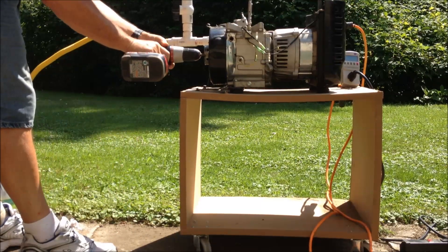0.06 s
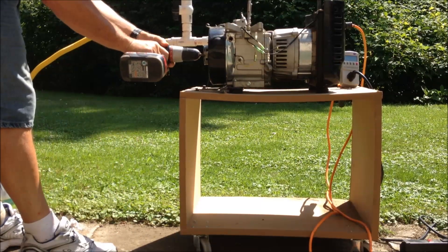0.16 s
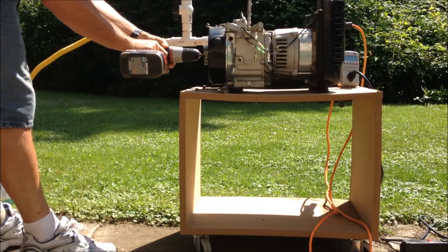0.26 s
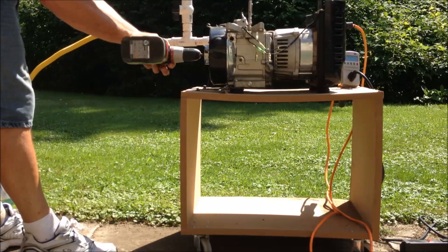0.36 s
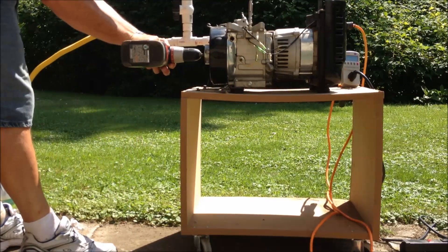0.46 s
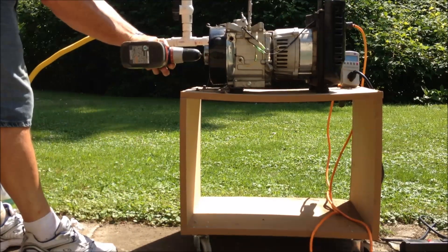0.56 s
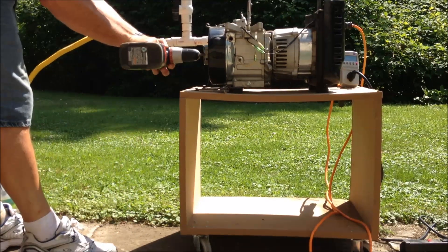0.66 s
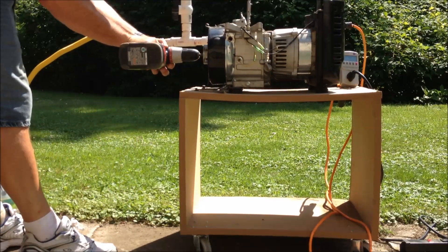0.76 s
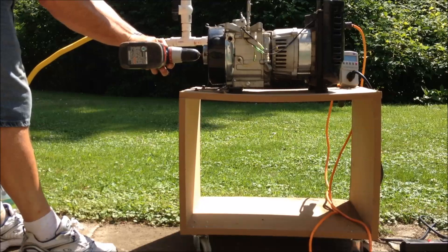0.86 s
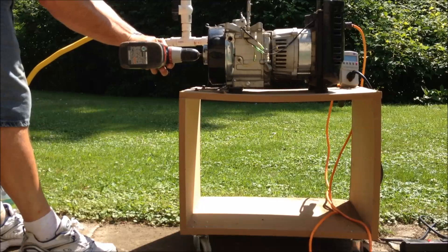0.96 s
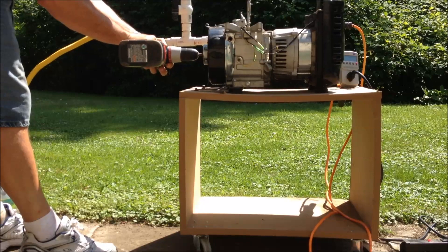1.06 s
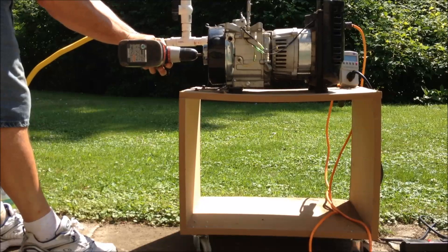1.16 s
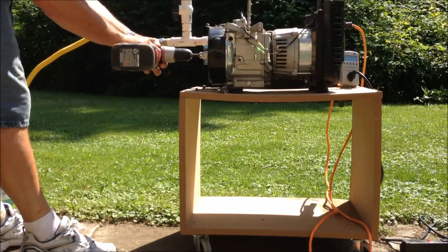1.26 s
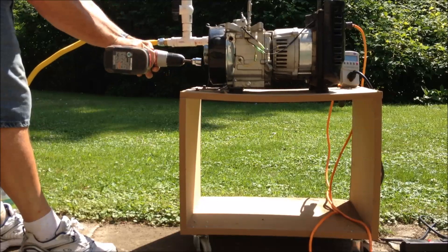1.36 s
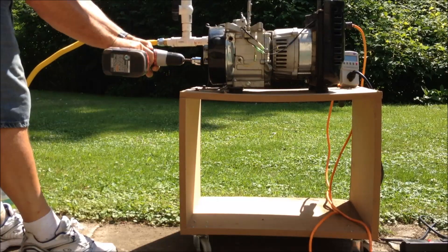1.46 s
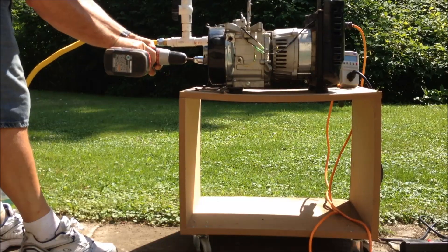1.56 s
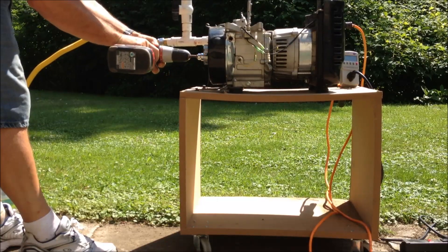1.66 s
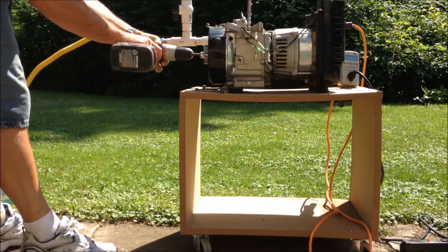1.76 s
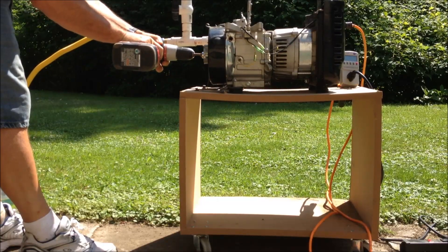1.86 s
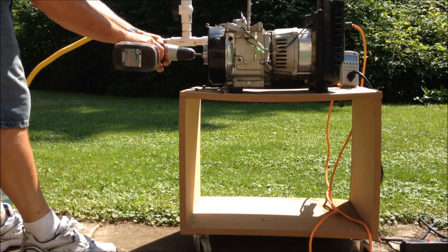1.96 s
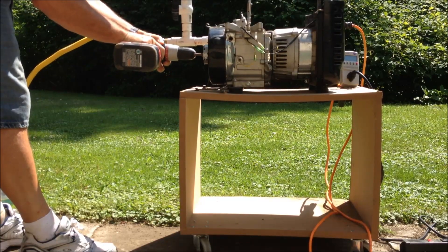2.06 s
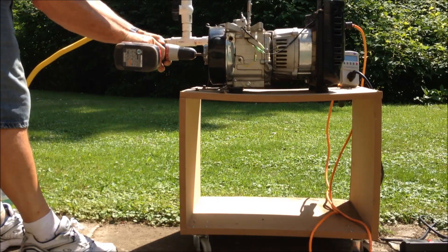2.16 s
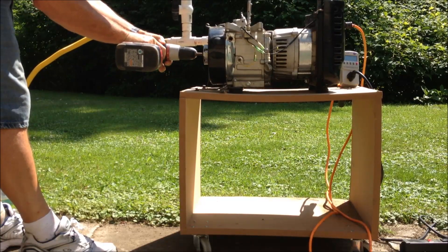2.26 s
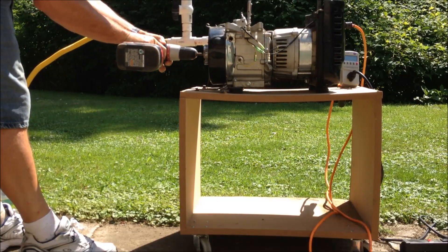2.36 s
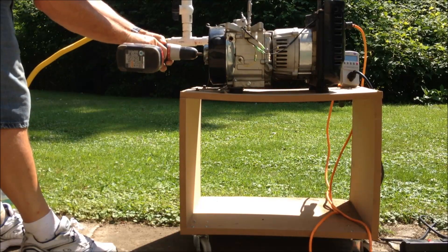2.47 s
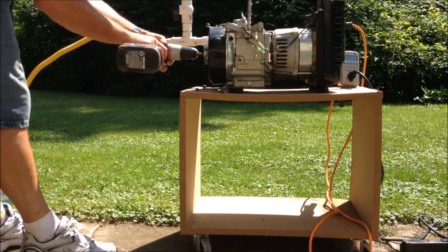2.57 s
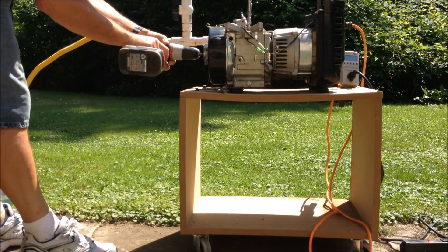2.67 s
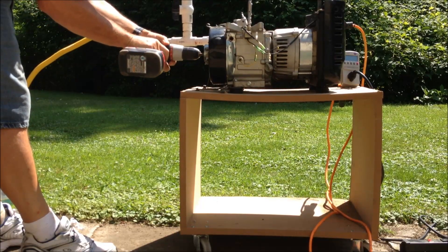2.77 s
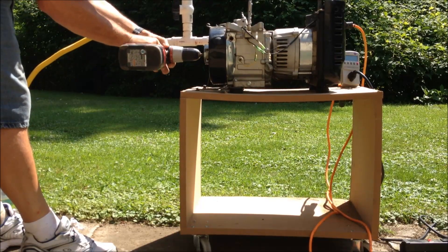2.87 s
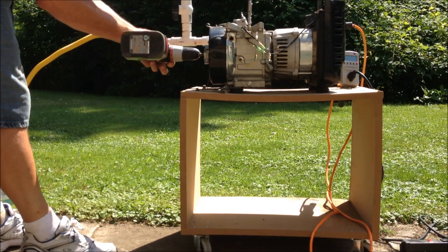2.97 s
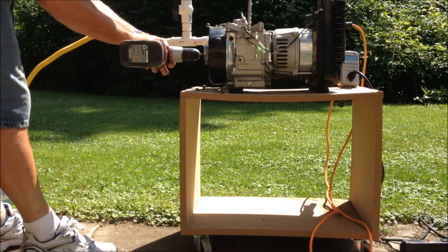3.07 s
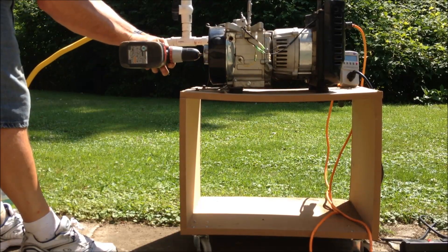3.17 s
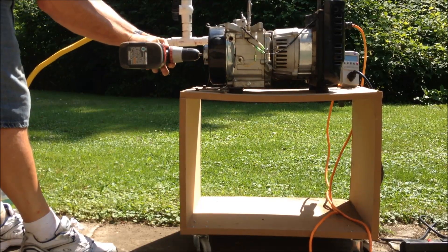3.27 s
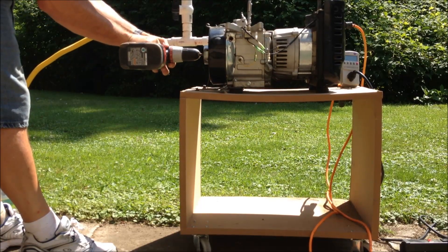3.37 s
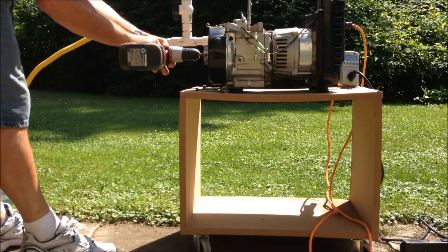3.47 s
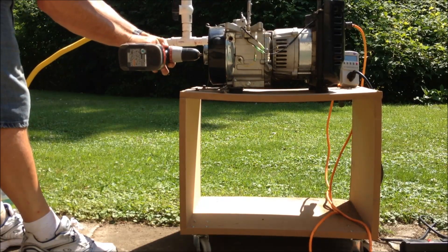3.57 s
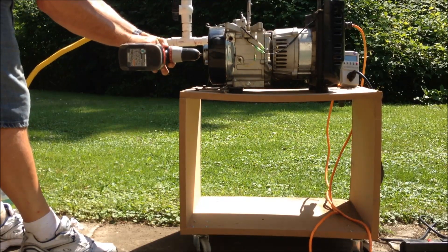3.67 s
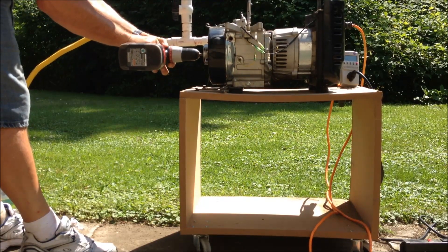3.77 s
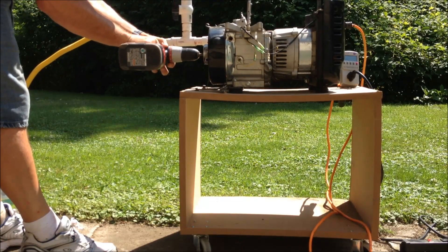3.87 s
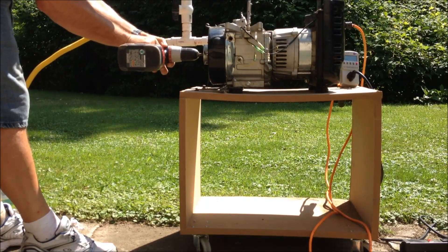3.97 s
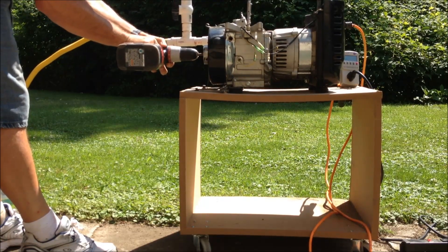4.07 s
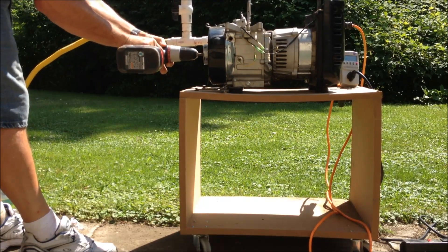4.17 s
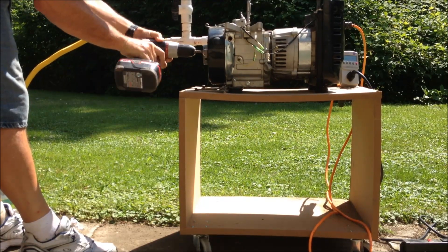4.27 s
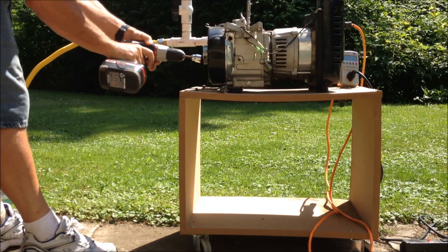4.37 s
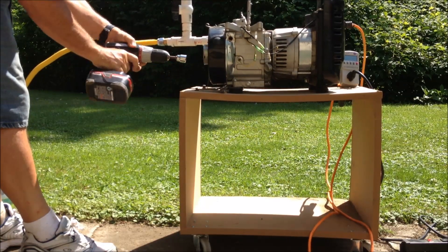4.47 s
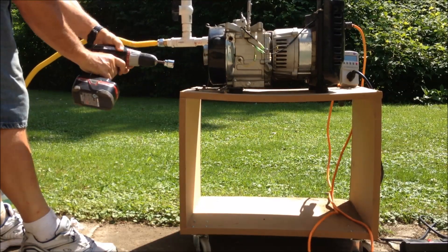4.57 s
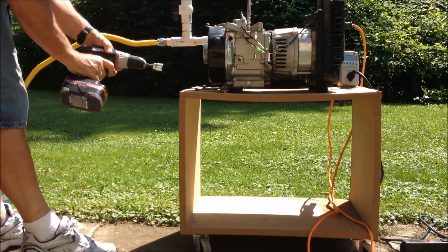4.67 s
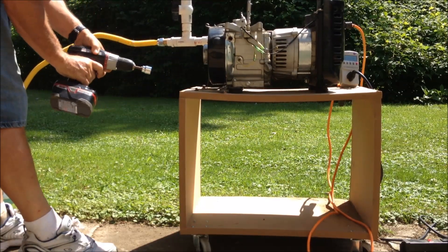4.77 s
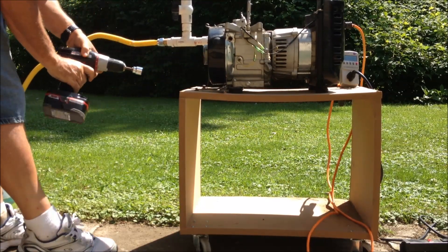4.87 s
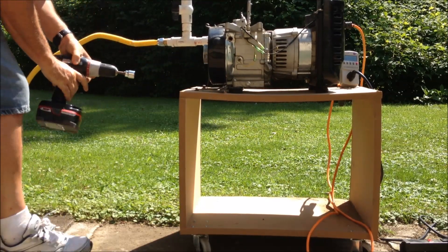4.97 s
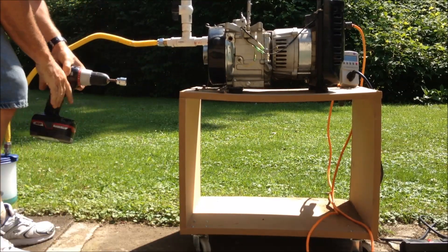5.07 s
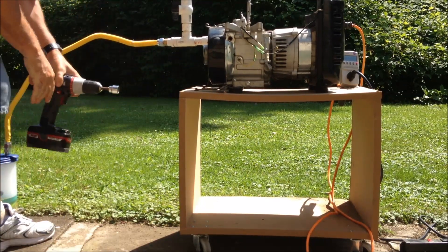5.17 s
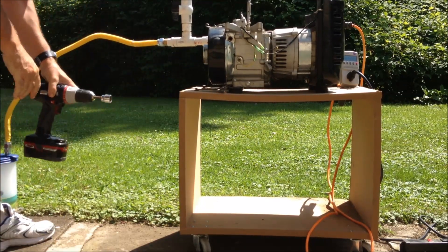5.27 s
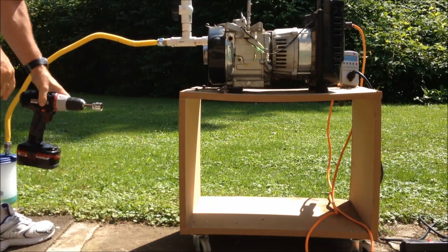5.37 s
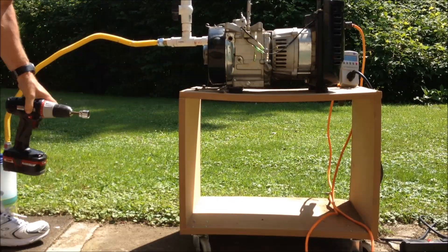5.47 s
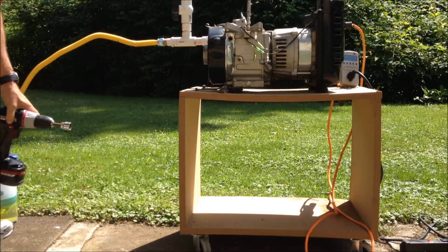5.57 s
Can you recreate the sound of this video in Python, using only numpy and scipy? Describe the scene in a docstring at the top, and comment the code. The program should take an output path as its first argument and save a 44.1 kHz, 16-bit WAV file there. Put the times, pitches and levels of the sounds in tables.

```python
"""In a garden, a cordless drill cranks a small four-stroke generator engine on a wooden stand.
First try: the gears whine, dragged down by each compression; the drill stops and friction slows the
unfired engine knock by knock, the socket rattling on its nut.
Second try: the gears squeal as the engine fires and overruns the drill; it throws the socket off with
a clink and settles at about 23 turns a second, clattering and puffing through its muffler."""
import sys
import numpy as np
from scipy import signal
from scipy.fft import rfft, irfft, next_fast_len
from scipy.io import wavfile
from scipy.ndimage import uniform_filter1d

SR = 44100
rng = np.random.default_rng(int(sys.argv[2]) if len(sys.argv) > 2 else 0)


def wrap_up_sound(samples):
    """Save the sound to the file named by the first command line argument, as 16-bit audio."""
    columns = np.atleast_2d(samples).T
    # keep every value between -1 and 1, then stretch to whole-number steps
    tamed = np.clip(columns, -1, 1)
    steps = np.round(tamed * 32767).astype(np.int16)
    wavfile.write(sys.argv[1], SR, steps)


N = 247401
TIME = np.arange(N) / SR
CATCH_START_S, CATCH_END_S = 4.354, 4.545
FIRING = np.clip((TIME - CATCH_START_S) / (CATCH_END_S - CATCH_START_S), 0, 1)  # 0 unfired, 1 running
CRANK_TURNS_PER_S, RUN_TURNS_PER_S = 20, 23.5
PUFF_PLACE = -.015  # firing puff; a place is a share of the two-turn cycle

# Trigger pulls. Each row: start in seconds, top gear pitch in Hz, then in seconds: gears unloaded,
# motor braked, braking time.
PULLS = [(.345, 2990, 1.237, 1.24, .085), (2.915, 2965, 3.99, 4.322, .04)]
# Resonances of crankcase, cowl and stand. Each row: centre in Hz, width in Hz, lift in dB.
CASE_MODES = [(496.3, 17, 13.5), (683, 5.3, 10), (713.5, 11, 11.5), (825, 6.8, 9), (911, 20.5, 9.5),
              (1094, 11, 10), (1146, 19, 8), (1610, 25, 6.5), (1715, 15, 9), (1996, 24, 7), (2188, 44, 9.5),
              (2395, 33, 8), (2598, 43, 8), (2744, 58, 8.5), (3067, 93, 7.5), (3620, 370, 6.5),
              (3935, 71, 10.5), (4195, 53, 12)]
# Spectrum of the drill's hiss. Each row: frequency in Hz, level in dB.
HISS_COLOUR = [(300, -19), (1500, 9.5), (3000, 12), (4300, 15.5), (5500, 1), (6500, 5), (8500, 2.5),
               (10500, -3), (15000, -11)]


def undb(db):
    """Decibels to gain."""
    return 10 ** (np.asarray(db) / 20)


def unit(x):
    """Scale to rms 1."""
    return x / np.sqrt(np.mean(x ** 2) + 1e-18)


def curves(table):
    """Each column of (s, ..) rows, interpolated over time."""
    s, *columns = np.transpose(table)
    return [np.interp(TIME, s, c) for c in columns]


def during(start_s, end_s):
    """1 between two times, with soft edges."""
    return uniform_filter1d(1. * ((TIME >= start_s) & (TIME <= end_s)), size=400)


def add(out, s, sound):
    """Mix a sound in at a time."""
    i = int(np.clip(s * SR, 0, N))
    out[i:i + len(sound)] += sound[:N - i]


def walk(rate_hz):
    """Smooth random wander, spread near 1."""
    k = int(SR / rate_hz)
    return 1.27 * uniform_filter1d(np.repeat(rng.standard_normal(N // k + 1), k), k)[:N]


def colour(x, points, resonances=()):
    """Minimum-phase filter from a spectrum and resonances; white noise keeps its level."""
    n = next_fast_len(N + SR // 4) // 2 * 2
    f = np.arange(n // 2 + 1) * SR / n
    hz, db = np.transpose(points)
    gain = undb(np.interp(np.log(f + 1), np.log(hz), db))
    peaks = sum((undb(lift) ** 2 - 1) / (1 + (2 * (f - c) / w) ** 2) for c, w, lift in resonances)
    cepstrum = irfft(np.log(unit(gain * np.sqrt(1 + peaks))), n)
    cepstrum[1:n // 2] *= 2
    cepstrum[n // 2 + 1:] = 0
    return irfft(rfft(x, n) * np.exp(rfft(cepstrum)), n)[:N]


def ring(x, modes):
    """Drive (Hz, dB, t60 s) modes; white noise keeps its level."""
    t = np.arange(SR // 4) / SR
    tail = sum(undb(db) * np.cos(2 * np.pi * hz * t) * undb(-60 * t / t60) for hz, db, t60 in modes)
    return signal.fftconvolve(x, tail / np.linalg.norm(tail))[:N]


def grit(per_s, scatter_db):
    """Dense tiny impacts of uneven size, rms 1."""
    impacts = (rng.random(N) < per_s / SR) * rng.choice([-1, 1], N)
    return unit(impacts * undb(scatter_db * rng.standard_normal(N)))


def blows(events, rise_s, decay_s):
    """Envelope of (s, dB) blows; powers add."""
    t = np.arange(SR // 4) / SR
    shape = (1 - np.exp(-t / rise_s)) * np.exp(-t / decay_s)
    power = np.zeros(N)
    for s, db in events:
        add(power, s, (undb(db) * shape / shape.max()) ** 2)
    return np.sqrt(power)


def steady(envelope):
    """Divide out an envelope's slow level."""
    return envelope / np.sqrt(uniform_filter1d(envelope ** 2, size=SR // 5) + 1e-9)


def each_cycle(cycle, places, scatter_db=1):
    """(s, dB) of every blow, from one cycle's (place, dB) pattern."""
    counts = np.arange(int(cycle[-1]) + 1)
    chance = rng.standard_normal((len(counts), len(places)))
    return [(np.interp(k + place, cycle, TIME), db + scatter_db * chance[k, j])
            for k in counts for j, (place, db) in enumerate(places) if 0 < k + place < cycle[-1]]


def pushes(cycle, places):
    """An impulse at each (place, dB) of every cycle; rms 1 while the crank turns."""
    out = np.zeros(N)
    for s, db in each_cycle(cycle, places):
        add(out, s, undb([db]))
    return out / np.std(out[np.gradient(cycle) > 0])


def compression(cycle, place, width):
    """Peaks at 1 once a cycle, as the piston squeezes the charge."""
    return np.exp(-(((cycle - place + .5) % 1 - .5) / width) ** 2)


def coasting():
    """1 between the pulls, when nothing drives the engine."""
    return during(PULLS[0][3], PULLS[1][0])


def garden(hush_db=-38):
    """Outdoor hush and the wavering drone of a far motor."""
    # Each row: time in seconds, pitch in Hz, level in dB.
    drone_path = [(0, 143, -55), (.8, 133.4, -49.5), (2.1, 136.9, -47), (2.5, 133.3, -51),
                  (3.6, 135.6, -48), (5.6, 143, -55)]
    # Each row: frequency in Hz, level in dB.
    hush_colour = [(15, -79), (25, -55), (80, -13.5), (104, -5.5), (126, -7.5), (148, 1), (164, -9.5),
                   (233, 2), (297, -4.5), (349, -6), (552, -6.5), (1020, 1.5), (1170, -3.5), (1300, -3),
                   (4200, -21.5), (5500, -34.5), (8000, -34), (15500, -50)]
    hz, db = curves(drone_path)
    phase = 2 * np.pi * np.cumsum(hz * (1 + .01424 * walk(11))) / SR
    drone = np.sqrt(2) * undb(db + 2 * walk(4.9)) * np.sin(phase)
    return drone + colour(rng.standard_normal(N), hush_colour) * undb(hush_db + 1.85 * walk(6.7))


def chink(freedom, grip_db=6):
    """One ring of the socket: the tighter the hold, the shorter and more varied."""
    # Each row: frequency in Hz, level in dB, free t60 in seconds.
    modes = [(4400, -7, 0.079), (6180, -10, 0.17), (6580, -4, 0.073), (7800, -2, 0.14), (7970, -7, .1),
             (8452, -6, .04), (10350, -18, 0.14), (12150, -16, .12), (12680, -22, .11), (14200, -15, .13)]
    t = np.arange(SR // 5) / SR
    out = np.zeros(len(t))
    for hz, db, t60 in modes:
        gain = undb(db + grip_db * (1.5 - freedom) * rng.uniform(-1.1, 1))
        out += gain * np.sin(2 * np.pi * (hz * t + rng.random())) * undb(-60 * t / (t60 * freedom))
    return out


def socket(speed, rattle_db=-3, rise_s=.0027, tail_db=-10, loose_db=-48):
    """The steel socket rattles drily on the nut and rings when struck."""
    # Each row: start in seconds, level in dB.
    rattles = [(1.29, -25), (1.356, -31), (1.402, -25.5), (1.474, -31.5), (1.524, -26), (1.605, -34),
               (1.665, -27), (1.738, -32), (1.824, -28.5), (1.912, -46), (2.018, -33), (2.03, -35),
               (2.138, -42), (2.29, -41), (2.327, -35), (2.916, -30)]
    # Each row: start in seconds, ring in dB, crack in dB, freedom to ring from 0 to 1.
    clinks = [(1.673, -44, -40, .5), (2.366, -40, -40, 0.8), (2.41, -49, -40, .3), (2.731, -43.5, -48, .35),
              (4.372, -27, -19.5, 0.5), (4.378, -19, -23, 1), (4.391, -26, -34, 0.9)]
    # Each row of both: frequency in Hz, level in dB.
    rattle_colour = [(500, -12), (2000, 11.5), (4000, 8), (6000, -3), (8300, 0.5), (10000, -7.5),
                     (12000, -11.5), (15000, -18)]
    crack_colour = [(500, -6), (2000, 6), (4200, 7), (5500, -13), (6500, -2), (7700, 8), (9200, -3),
                    (11000, -12), (14300, -8), (15000, -10)]
    tails = undb(tail_db) * blows(rattles, rise_s, decay_s=.059)
    bursts = undb(rattle_db) * np.hypot(blows(rattles, rise_s, decay_s=.014), tails)
    loose = undb(loose_db + 2.5 * walk(70)) * coasting() * speed / CRANK_TURNS_PER_S
    cracks = blows([(s, db) for s, _, db, _ in clinks], rise_s=.0012, decay_s=.014)
    out = colour(grit(11000, 2.8) * np.hypot(bursts, loose), rattle_colour)
    out += colour(grit(11000, 1.5) * cracks, crack_colour)
    for s, ring_db, _, freedom in clinks:
        add(out, s, undb(ring_db) * chink(freedom))
    return out


def motor_start(lead_s=.029, level_db=-44.5):
    """On the first pull the motor whirs while the drive's play is taken up."""
    swell = blows([(PULLS[0][0] - lead_s, level_db)], rise_s=.05, decay_s=.076)
    return colour(grit(12000, 2.7) * swell, HISS_COLOUR)


def squeals(overtone_db=-13):
    """The gears squeal as the firing engine snatches the drill."""
    # Each row: start in seconds, first and last pitch in Hz, length in seconds, level in dB,
    # roughness as a share of the pitch.
    glides = [(4.023, 3250, 2970, 0.024, -15, 0.02), (4.062, 3300, 2870, 0.017, -12.5, 0),
              (4.1, 3250, 3090, 0.036, -16.5, 0.09), (4.145, 3280, 2830, 0.035, -16, 0),
              (4.27, 3580, 3720, 0.0345, -15, 0.07), (4.289, 3246, 2794, 0.056, -13.5, 0.12)]
    out = np.zeros(N)
    for s, start_hz, end_hz, length_s, db, rough in glides:
        n = int(length_s * SR)
        hz = np.linspace(start_hz, end_hz, n) * (1 + rough * walk(2000)[:n])
        phase = 2 * np.pi * np.cumsum(hz) / SR
        tone = np.sin(phase) + undb(overtone_db) * np.sin(2.07 * phase)
        add(out, s, undb(db) * np.hanning(n) * tone)
    return out


def drill_speed(pull, spin_up_s=.175):
    """Share of top speed: the motor gathers speed ever more slowly, then is braked."""
    start_s, _, _, braked_s, braking_s = pull
    rise = 1 - np.exp(-np.maximum(TIME - start_s, 0) / spin_up_s)
    return rise * np.clip(1 - (TIME - braked_s) / braking_s, 0, 1)


def drill(pull, cycle, housing_hz=2900, housing_width_hz=500, socket_hz=6450, shudders_per_cycle=5.5):
    """Gear whine and hiss grow with speed; each compression drags them down and shakes the drive."""
    # Each row: multiple of the whine's pitch, level in dB.
    overtones = [(2.02, 4), (3, -4), (4.01, -8), (5.02, -14), (6, -19)]
    # Chuck and socket resonances. Each row: centre in Hz, width in Hz, lift in dB.
    chuck_modes = [(4340, 240, 3), (6510, 200, 3.5), (8660, 520, 2)]
    start_s, top_hz, unloaded_s, _, _ = pull
    speed = drill_speed(pull)
    hz, speed_db = top_hz * speed, 20 * np.log10(speed + 1e-4)
    housing_db = 7.5 / (1 + (2 * (hz - housing_hz) / housing_width_hz) ** 2)
    whine_db = -27 + 1.2 * speed_db + housing_db
    gear_db = -25 + .78 * speed_db
    strain = np.clip((.92 - speed) * 5, 0, 1)
    drag = compression(cycle, place=.88, width=.1)
    shudder = 2 * np.pi * shudders_per_cycle * ((cycle + .1) % 1 - .11)
    jitter = .011 * walk(450) + .014 * strain * walk(900)
    hz = hz * (1 - .032 * drag - .0072 * np.sin(shudder) + jitter)
    phase = 2 * np.pi * np.cumsum(hz) / SR
    # uneven teeth roughen the whine and smear its overtones
    rough_db, smear = (2.2 + 1.5 * strain) * walk(420), .45 * walk(700)
    size = undb(whine_db - 9 * drag + 3 * np.cos(shudder) + rough_db)
    whine = size * (np.sin(phase + smear / 2) + undb(-15) * np.sin(2 * phase + smear))
    # overtones stand out under strain
    upper = sum(undb(db) * np.sin(k * (phase + smear * (1 - strain))) for k, db in overtones)
    whine += upper * undb(gear_db - 18.5 + 6 * strain + rough_db)
    # the third partial sweeps through the socket's ring
    third = undb(gear_db - 6) * np.sin(3 * phase + smear)
    ringing = signal.lfilter(*signal.iirpeak(socket_hz, Q=18, fs=SR), third)
    hiss = colour(grit(12000, 3.7) * undb(gear_db - drag + 1.4 * walk(60)), HISS_COLOUR, chuck_modes)
    singing = during(start_s, unloaded_s) * np.clip((speed - .35) / .25, 0, 1)
    return (whine + ringing) * singing + hiss * np.clip(speed / .073, 0, 1)


def crank_speed(whine_per_turn=150.3, coast_s=1.2, friction_turns_per_s2=13.35, stall_s=2.5):
    """Turns per second: driven, slowed by friction, stalled by compression, driven again, running."""
    # Under its own power. Each row: time in seconds, turns per second.
    run_speed = [(4.0, 19.8), (4.2, 20.75), (4.55, 21.9), (4.78, 24.7), (5.05, 23.5), (5.25, 23.0),
                 (5.61, 23.65)]
    first, second = (drill_speed(pull) * pull[1] / whine_per_turn for pull in PULLS)
    coast = np.interp(coast_s, TIME, first) - friction_turns_per_s2 * (TIME - coast_s)
    coast = np.maximum(coast, 0) * np.clip((stall_s - TIME) / .1, 0, 1)
    stages = [TIME < coast_s, TIME < stall_s, TIME < run_speed[0][0]]
    return np.select(stages, [first, coast, second], curves(run_speed)[0])


def engine_size(speed, cranked_db=-27, coasting_db=-26.5, running_db=-25.5):
    """Base gain of the engine's noise: grows with speed, harder under power."""
    unfired_db = cranked_db + (coasting_db - cranked_db) * coasting()
    unfired = undb(unfired_db) * (speed / CRANK_TURNS_PER_S) ** .61
    fired = undb(running_db + .5 * (speed - RUN_TURNS_PER_S))
    return unfired * (1 - FIRING) + fired * FIRING


def chuffs(cycle, size, gain_db=-10.5):
    """The unfired cylinder pumps air through the muffler."""
    # Each row: place in the cycle, level in dB.
    gulps = [(.06, 0), (.64, -2)]
    # Each row: frequency in Hz, level in dB.
    air_colour = [(60, -32), (120, -4.5), (180, 5.5), (260, 4), (380, -18), (1000, -31), (15000, -68)]
    flow = blows(each_cycle(cycle, gulps), rise_s=.015, decay_s=.011)
    return undb(gain_db) * colour(rng.standard_normal(N) * flow * size * (1 - FIRING), air_colour)


def thumps(cycle, size, gain_db=-11):
    """The rocking engine thumps its panels through soft mounts."""
    # Each row: frequency in Hz, t60 in seconds, cranked level in dB, firing level in dB.
    panel_modes = [(491, .08, -3, -22), (688, .16, -3, -7), (714, .18, -3, -9), (820, .2, -1, -6),
                   (900, .08, -4, -4), (1090, .08, -6, -3)]
    # Each row: place in the cycle, level in dB.
    crank_rocks = [(0.052, -2), (0.338, -9), (0.678, -3.5)]
    firing_kicks = [(PUFF_PLACE, 0), (PUFF_PLACE + .5, -1.4)]
    mounts = signal.butter(2, [430, 1900], "band", fs=SR, output="sos")
    rocks = signal.sosfilt(mounts, pushes(cycle, crank_rocks) * size * (1 - FIRING))
    kicks = signal.sosfilt(mounts, pushes(cycle, firing_kicks) * size * FIRING)
    cranked = ring(rocks, [(hz, db, t60) for hz, t60, db, _ in panel_modes])
    fired = ring(kicks, [(hz, db, t60) for hz, t60, _, db in panel_modes])
    return undb(gain_db) * (cranked + fired)


def knocks(gain_db=-5, decay_s=.0105, tail_db=-12, tail_s=.03):
    """The crank's slack clacks in the case at take-up, while coasting and at the first firings."""
    # Each row: start in seconds, level in dB, rise in seconds.
    hits = [(0.469, -16.5, .001), (1.253, -18, .002), (1.328, -19, 0.0024), (1.356, -16.5, 0.0044),
            (1.389, -20.5, 0.0018), (1.442, -20.5, .002), (1.475, -16.5, 0.0032), (1.513, -21.5, 0.0024),
            (1.568, -22.5, .002), (1.607, -18, .005), (1.65, -21.5, 0.0013), (1.712, -21.5, .004),
            (1.757, -19.5, 0.008), (1.806, -15.5, 0.00025), (1.881, -24, 0.0014), (1.9402, -16.5, 0.00046),
            (2, -19.5, 0.0025), (2.102, -24.5, 0.00073), (2.185, -19, .0004), (2.246, -30, 0.0008),
            (2.279, -18.5, 0.00076), (2.367, -26, .001), (2.917, -22, 0.0006), (4.303, -16, 0.002),
            (4.31, -14, .0004), (4.423, -14, 0.00057), (4.613, -11, 0.0015)]
    # Each row: frequency in Hz, level in dB.
    knock_colour = [(100, -41), (400, -7), (800, 3), (1600, 3), (2600, 3), (4200, -3.5), (5500, -15.5),
                    (8500, -21.5), (15000, -63)]
    clacks = sum(blows([(s, db)], rise_s, decay_s) ** 2 for s, db, rise_s in hits)
    chatter = blows([(s, db + tail_db) for s, db, _ in hits], decay_s, tail_s) ** 2
    return undb(gain_db) * colour(grit(14000, 2.6) * np.sqrt(clacks + chatter), knock_colour, CASE_MODES)


def barks():
    """Ragged bursts of gas in the outlet as the engine catches."""
    # Each row: start in seconds, level in dB.
    bursts = [(4.385, -25), (4.432, -26.5), (4.475, -36), (4.52, -25.5), (4.615, -28), (4.632, -21)]
    # Each row: frequency in Hz, level in dB.
    bark_colour = [(80, -28), (170, 2), (300, -2), (480, 4), (800, -2.5), (1300, 2.5), (2000, -16),
                   (5000, -35), (15000, -62)]
    return colour(grit(10000, 1.4) * blows(bursts, rise_s=.0034, decay_s=.015), bark_colour)


def exhaust(cycle, boom_db=-29.5, pipe_hz=1124, pipe_db=-32, rise_s=.0081, decay_s=.0075, sustain=.099):
    """One puff a turn booms in the muffler and blows a note in the outlet."""
    # Puff strength as the governor moves the throttle.
    # Each row: time in seconds, firing puff in dB, second puff in dB.
    throttle = [(4.4, -11, -18), (4.55, -7, 1), (4.63, -1, -1), (4.8, -1.5, 3.5), (4.96, 2, 0.5),
                (5.042, 1.5, -6), (5.39, -1.5, -0.5), (5.47, 1, 2), (5.61, 2.5, 1)]
    # A puff and its echoes. Each row: delay in cycles, level in dB.
    echoes = [(0, 0), (.175, -11), (.32, -10)]
    # Each row: frequency in Hz, level in dB, t60 in seconds.
    muffler_modes = [(202, 0, .027), (190, -11, .17), (150, -17, .09), (283, -12, .1)]
    times, *levels = np.transpose(throttle)
    puffs = []
    for turn, level in enumerate(levels):
        beats = each_cycle(cycle, [(PUFF_PLACE + turn / 2, 0)], scatter_db=.5)
        puffs += [(s, db + np.interp(s, times, level)) for s, db in beats if s > CATCH_START_S]
    force = np.zeros(N)
    for s, db in puffs:
        for delay, echo_db in echoes:
            add(force, s + delay * 2 / RUN_TURNS_PER_S, undb([db + echo_db]))
    low_band = signal.butter(2, [145, 320], "band", fs=SR, output="sos")
    boom = signal.sosfilt(low_band, ring(force, muffler_modes))
    flow = blows([(s - rise_s / 2, db) for s, db in puffs], rise_s, decay_s) + sustain * FIRING
    note = flow * np.sin(2 * np.pi * np.cumsum(pipe_hz * (1 + .0129 * walk(150))) / SR)
    running = TIME > CATCH_END_S
    return undb(boom_db) * boom / np.std(boom[running]) + undb(pipe_db) * note / np.std(note[running])


def clatter(cycle, size, coast_db=-4, run_db=5, tick_db=-33, crank_whirr=.79, run_whirr=.7):
    """Piston and valves knock on the case over a whirr of bearings and fan; harder once it fires."""
    # Each row: place in the cycle, level in dB.
    crank_knocks = [(0, 0), (.29, 1.5), (.58, -1), (.72, -4)]
    # Each row: place in the cycle, knock in dB, treble tick in dB.
    run_knocks = [(-.02, 0, 0), (.11, -1.5, -2), (.2, -4, -8), (.49, -2, -4), (.63, -1, -4), (.72, -8, -13),
                  (.86, -10, -8)]
    # Each row of all three: frequency in Hz, level in dB.
    crank_colour = [(30, -63), (70, -7), (115, -14.5), (170, -1), (260, -7), (380, -13), (700, 2),
                    (1300, -1.5), (2300, -1.5), (3200, -4), (4300, -11), (5500, -16), (8500, -20),
                    (15000, -36)]
    run_colour = [(30, -76), (80, -20), (120, -0.5), (200, 10.5), (280, -1), (420, -11.5), (700, 1.5),
                  (1120, 0), (1350, 3), (2300, -2), (3400, -1), (4300, -7), (5500, -17.5), (8500, -13.5),
                  (15000, -27.5)]
    tick_colour = [(100, 1), (1000, 10), (4000, 0), (6500, 5), (8200, 4), (10000, -9), (12000, -3),
                   (15000, -12)]
    free = coasting()
    driven = 1 - free - FIRING
    whirr = crank_whirr * (1 - compression(cycle, place=.9, width=.09) / 2)
    crank_blows = blows(each_cycle(cycle, crank_knocks), rise_s=.001, decay_s=.011)
    run_blows = blows(each_cycle(cycle, [k[:2] for k in run_knocks]), rise_s=.0063, decay_s=.012)
    unfired = free * undb(coast_db) + (1 - free) * steady(np.hypot(crank_blows, whirr))
    fired = undb(run_db) * steady(np.hypot(run_blows, run_whirr))
    body = colour(grit(6000, 2.25) * size * unfired * np.sqrt(1 - FIRING), crank_colour, CASE_MODES)
    body += colour(grit(9000, 3.1) * size * fired * np.sqrt(FIRING), run_colour, CASE_MODES)
    # slow, soft contacts carry less treble
    treble_db = driven - 6 * free - FIRING
    dull = signal.sosfiltfilt(signal.butter(2, 2000, fs=SR, output="sos"), body)
    body = dull + (body - dull) * undb(treble_db)
    ticks = steady(blows(each_cycle(cycle, [k[::2] for k in run_knocks]), rise_s=.001, decay_s=.012))
    return body + colour(grit(5500, 1.3) * ticks * FIRING * undb(tick_db), tick_colour)


def scene(second_try_shift_s=2.73, second_try_start_cycles=.09):
    """Two tries with the drill; the second catches."""
    speed = crank_speed()
    cycle = np.cumsum(speed) / SR / 2  # two turns per four-stroke cycle
    # sets where in the cycle the second try's knocks and whine dips begin
    cycle += second_try_start_cycles * during(second_try_shift_s, np.inf)
    size = engine_size(speed)
    starter = sum(drill(pull, cycle) for pull in PULLS) + motor_start() + squeals() + socket(speed)
    engine = clatter(cycle, size) + thumps(cycle, size) + chuffs(cycle, size)
    engine += knocks() + barks() + exhaust(cycle)
    return (starter + engine + garden())[None]


def record(dry, notch_hz=4930, notch_q=11, bass_hz=45, top_hz=15450):
    """Microphone: narrow notch, deep bass and top cut."""
    notch = signal.iirnotch(notch_hz, notch_q, SR)
    sound = signal.lfilter(*notch, signal.lfilter(*notch, dry))
    sound = signal.sosfilt(signal.butter(2, bass_hz, "high", fs=SR, output="sos"), sound)
    return signal.sosfilt(signal.ellip(10, .2, 80, top_hz, fs=SR, output="sos"), sound)


dry = scene()
out = record(dry)
wrap_up_sound(out)
```